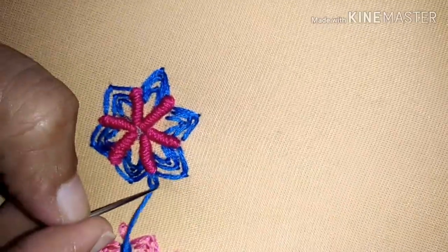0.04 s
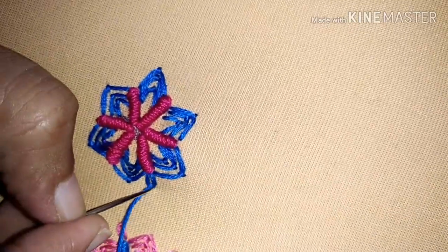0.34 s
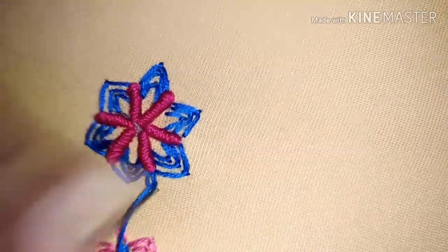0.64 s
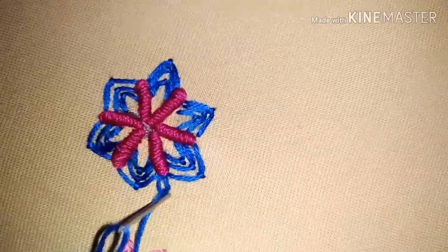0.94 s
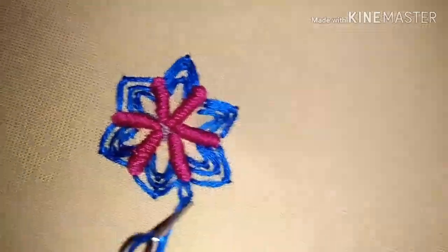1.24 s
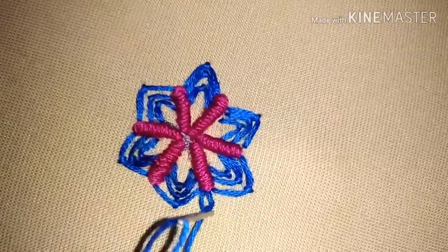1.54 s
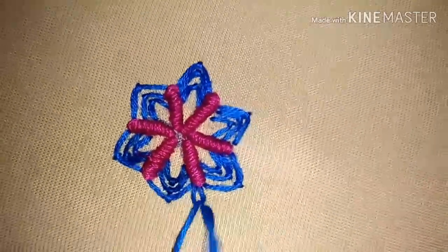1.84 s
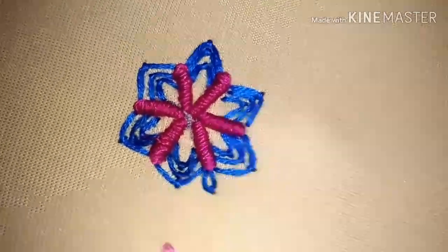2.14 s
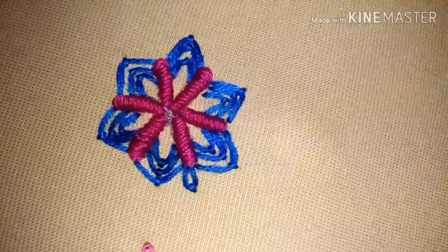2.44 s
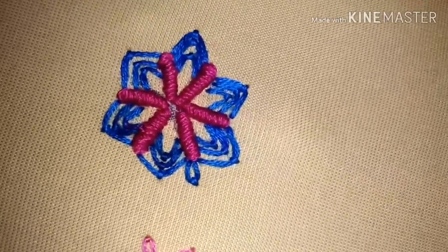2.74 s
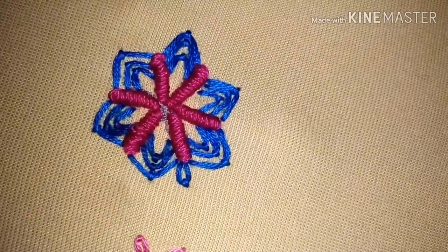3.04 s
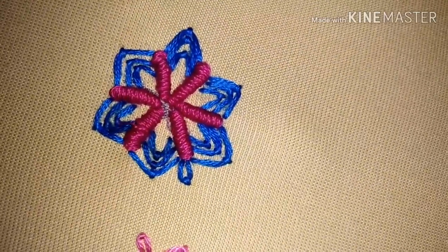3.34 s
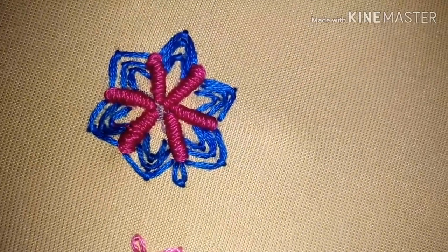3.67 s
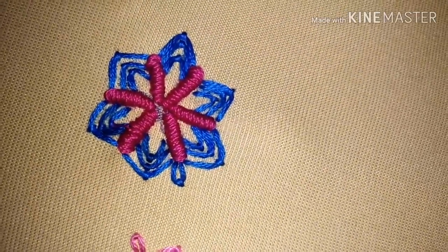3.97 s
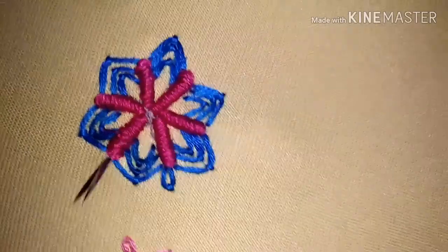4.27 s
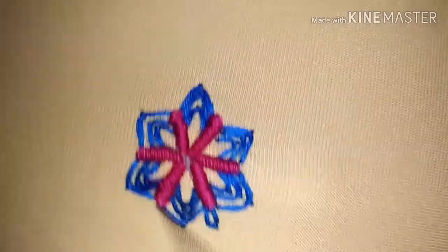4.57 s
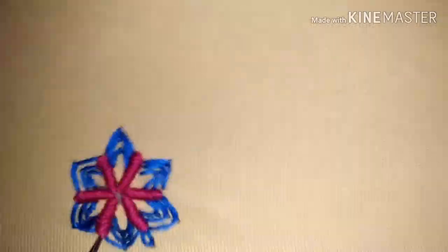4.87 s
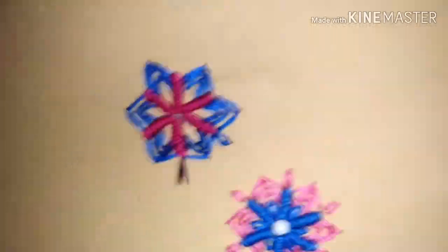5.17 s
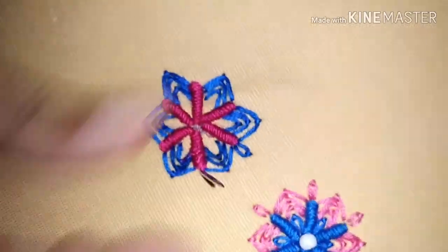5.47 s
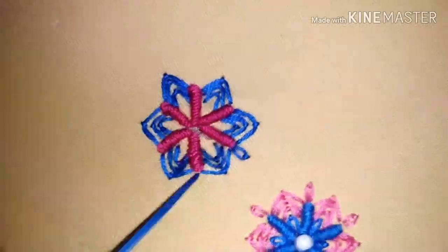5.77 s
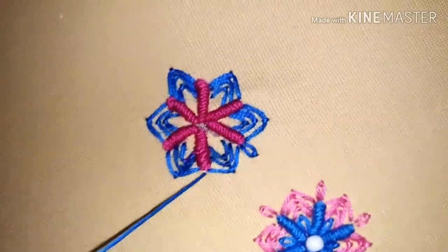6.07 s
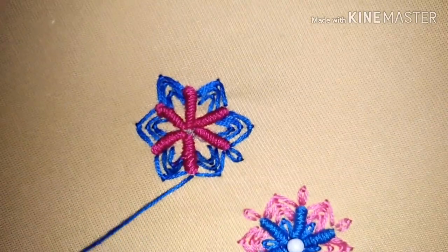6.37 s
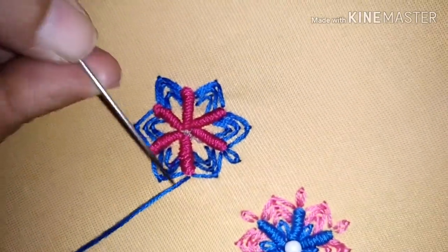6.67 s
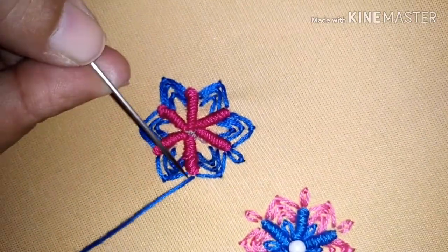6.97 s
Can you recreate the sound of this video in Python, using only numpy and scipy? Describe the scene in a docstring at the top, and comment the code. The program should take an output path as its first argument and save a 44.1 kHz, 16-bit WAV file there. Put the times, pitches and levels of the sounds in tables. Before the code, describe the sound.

Low room noise and a faint steady hum run throughout, with everything close to a small microphone and almost no echo. A hand rustles softly on an embroidery hoop, and a needle ticks at about 0.6 seconds, followed by light bumps and a faint slide of thread. At 1.9 seconds the needle pops through the taut cloth with a loud snap and a short boom like a slack drum; thread rasps and hisses after it until about 2.3 seconds. A sharp tick comes at 2.7 seconds, a soft bump at 3, then a few tiny ticks. Around 4.7 seconds the needle catches in a quick, bright cluster of ticks, with faint thread hiss and gentle nudges following. At 5.9 seconds comes a second loud pop with a deeper thump and a rasping pull of thread. Soft bumps and rustles fade by about 7 seconds.

```python
"""Low room noise and a faint hum, with a hand rustling on an embroidery hoop close to a small microphone.
The needle ticks as its point catches on strands, and fingers nudge the stretched cloth. Twice the eye
pops through: a snap coloured by the microphone's body, the cloth booming like a slack drum, and thread
rasping and hissing after it. The room is quiet, and at this distance little of it comes back."""
import sys
import numpy as np
from scipy import signal
from scipy.fft import rfft, irfft
from scipy.io import wavfile

SR = 44100
rng = np.random.default_rng(int(sys.argv[2]) if len(sys.argv) > 2 else 0)


def master_out(mix):
    """Clip the mix to full scale and print it as 16-bit PCM to the path in sys.argv[1]."""
    frames = np.transpose(np.atleast_2d(mix))
    ceiling = np.clip(frames, -1, 1)
    pcm = np.round(ceiling * 32767).astype(np.int16)
    wavfile.write(sys.argv[1], SR, pcm)


N = 317916
TIME = np.arange(N) / SR

# Spectra, all (frequency [Hz], relative level per Hz [dB])
AIR_SPECTRUM = [(20, -29), (40, 2), (57, 10.5), (80, 3), (130, -5.5), (300, -2.5), (650, -17.5),
                (1050, -5.5), (1500, -12), (2100, -12.5), (3100, -20.5), (5000, -21.5), (6200, -24),
                (7500, -61), (14000, -75)]  # steady air in the room
DRONE_SPECTRUM = [(60, -22.5), (150, -9), (230, -2.5), (340, -0.5), (450, -8), (650, -11.5), (1200, -26.5),
                  (3000, -29), (6000, -27.5), (8000, -45), (14000, -58.5)]  # the room's low drone
BRUSH_SPECTRUM = [(40, -7), (130, -4.5), (230, 4), (360, 3), (600, -9), (1300, -15), (3000, -23),
                  (6000, -24), (14000, -65)]  # a fingertip on cloth
HISS_SPECTRUM = [(300, -13), (1300, 6), (2000, 4), (2700, 2), (3300, 3), (3850, 6), (4700, 6), (6800, 2),
                 (8000, -5.5), (9600, -10), (10300, -6.5), (11200, -12), (14000, -42)]  # thread sliding through the weave
RUSTLE_SPECTRUM = [(40, -18), (120, 6.5), (400, 6), (800, -0.5), (1250, -2), (1700, -12.5), (3000, -13),
                   (6000, -36)]  # cloth under the thread's pull
CRACK_SPECTRUM = [(80, 16), (400, 0), (900, 3.5), (1400, 0), (2050, -0.5), (2700, -1.5), (3500, -5),
                  (4300, -2.5), (5500, -9.5), (7500, -13), (10000, -18.5), (14000, -31)]  # the point catching
STRAIN_SPECTRUM = [(30, -18), (70, 24.5), (120, -19), (300, 3.5), (700, -17.5), (2000, -24), (7000, -37),
                   (14000, -69)]  # cloth groaning under the eye
MIC_BODY_SPECTRUM = [(60, -16), (200, -2.5), (420, -3), (600, -3), (800, -13), (1020, -12), (1450, -11.5),
                     (2050, -31), (2700, -23.5), (3600, -39), (5300, -29), (6600, -62), (8000, -74),
                     (14000, -102)]  # the snap as coloured by the microphone's body, notched near 2 kHz
RASP_SPECTRUM = [(60, 12), (300, 19.5), (700, 9), (1350, 4), (2000, -6), (2700, -3.5), (3300, -11),
                 (3900, -5), (5000, -7.5), (6800, -8), (7500, -23), (8200, -15.5), (9200, -19.5),
                 (14000, -33)]  # doubled thread following the eye
CIRCUIT_SPECTRUM = [(25, 15), (100, -6), (1000, -1.5), (7000, -2), (10000, -2), (14000, -4)]  # microphone circuit noise, rising in the deep bass

# An appliance in the room: (frequency [Hz], rms level [dB])
HUM_LINES = [(100, -74.5), (333.8, -78.5), (899, -87.5), (1701, -84)]
# The room's decay: (frequency [Hz], time to fall 60 dB [s])
ROOM_DECAY = [(100, 0.34), (500, 0.15), (2000, 0.22), (6000, 0.22), (14000, 0.28)]
# Modes of the stretched cloth: (frequency [Hz], level [dB], time to fall 60 dB [s])
CLOTH_MODES = [(66.3, 3.5, 0.095), (95.1, 4.5, 0.094), (157, -14.5, 0.13), (198, -19.5, 0.096),
               (254, -16.5, 0.11), (362, -21.5, 0.16), (385, -24, .1), (469.5, -13.5, 0.065),
               (518, -23.5, 0.16), (620, -32, .08)]
# The hand shifts its grip on the hoop: (start [s], end [s], rustle [dB])
GRIP_SHIFTS = [(0.054, 0.075, -60), (0.33, 0.43, -59.5), (0.556, 0.753, -63), (1.042, 1.31, -64),
               (1.666, 2.313, -62.5), (2.612, 3.26, -66.5), (4.39, 5.603, -67.5), (6.18, 6.926, -67.5)]
# Fingers nudge the hoop: (time [s], cloth [dB], overtones [dB], brush [dB])
HOOP_NUDGES = [(.735, -53, 7, -64), (0.888, -48, -18, -57), (0.983, -49, -8, -59), (1.289, -56, 0, -56),
               (1.46, -50, -11, -57), (2.131, -51, -4, -53), (2.28, -48.5, -3, -56.5),
               (2.521, -50, -14, -58), (2.694, -48, 14, -49), (2.989, -40, -9, -55), (4.57, -47.5, 0, -54),
               (5.211, -49, -6, -58), (5.282, -49.5, -10, -58.5), (6.221, -41.5, -16, -61),
               (6.37, -52, -5, -65), (6.581, -48, -14, -59)]
# Thread is drawn through: (time at full speed [s], hold [s], release [s], hiss [dB], rustle [dB])
THREAD_PULLS = [(1.098, 0.022, 0.12, -66, -68), (1.90, 0.055, .015, -66.5, -58),
                (2.036, 0.071, 0.11, -67.5, -57), (2.13, 0.025, 0.015, -72.5, -58.5),
                (4.605, 0.087, 0.074, -69, -65), (4.924, .14, .3, -72, -72), (5.268, 0.018, 0.12, -91, -72),
                (5.896, 0.028, 0.018, -58, -52), (5.987, .11, 0.016, -68.5, -62),
                (6.218, .03, .04, -76.5, -63)]
# The point catches on a strand: (time [s], crack [dB], ping [dB], ping pitch [Hz],
# push on the cloth [dB], strand [dB], strand pitch [Hz])
NEEDLE_TICKS = [(0.5917, -34.5, -42, 5660, -78, -53, 4076), (0.617, -49, -70, 5500, -61, -53, 1060),
                (2.6844, -39.5, -33.5, 5560, -46.5, -39, 550), (3.217, -62, -59, 5500, -81, -76, 1000),
                (3.2294, -52, -52.5, 5320, -66, -70, 1000), (3.246, -62, -62, 5500, -78, -76, 1000),
                (3.777, -64, -62, 5550, -87, -76, 1000), (4.658, -61, -34, 6000, -74, -43, 1800),
                (4.6596, -38, -23, 5540, -50, -44, 2970), (4.662, -32, -25, 5230, -46, -31, 432),
                (4.6664, -38, -23.5, 5500, -53, -46, 850), (4.6721, -41, -36.5, 5380, -54, -45, 445),
                (4.974, -69, -55, 5700, -76, -63, 400)]
# The eye pops through: (time [s], direction up or down [signed gain], snap [dB], boom lag [s],
# boom [dB], rocking mode [dB], overtones [dB], rasp [dB], rasp length [s], strain [dB],
# strand [dB], strand pitch [Hz])
EYE_POPS = [(1.8554, 0.86, -9.5, 0.00657, -21, 1, 5, -39, 0.05, -28.5, -28, 169.4),
            (5.859, -1.14, -12, 0.0012, -13, -6, 0.5, -38.5, 0.049, -26, -45, 467)]


def amp(db):
    return 10 ** (np.asarray(db) / 20)


def unit_rms(x):
    return x / np.sqrt(np.mean(x ** 2) + 1e-20)


def value_at(points, hz):
    """Interpolates a table over a log-frequency axis."""
    f, value = np.transpose(points)
    return np.interp(np.log(hz + 1), np.log(f + 1), value)


def colour(x, spectrum):
    """Shapes x by a spectrum; rms 1."""
    gain = amp(value_at(spectrum, np.fft.rfftfreq(len(x), 1 / SR)))
    return unit_rms(irfft(rfft(x) * gain, len(x)))


def noise(spectrum, size=N):
    return colour(rng.standard_normal(size), spectrum)


def add(mix, at, sound):
    part = mix[round(at * SR):][:len(sound)]
    part += sound[:len(part)]


def wander(top_hz):
    """A random curve moving at rates from 1 Hz to top_hz; rms 1."""
    hz = np.fft.rfftfreq(N, 1 / SR)
    return unit_rms(irfft(rfft(rng.standard_normal(N)) * (hz > 1) * (hz < top_hz), N))


def stroke(at, hold, attack, release):
    """An envelope that swells up to the given time, holds, and dies away."""
    return np.exp(-(np.maximum(at - TIME, 0) / attack) ** 2 - np.maximum(TIME - at - hold, 0) / release)


def burst(hz, rise_s):
    """A short tone that swells to its peak in rise_s and soon dies."""
    t = TIME[:SR // 10]
    return (t / rise_s * np.exp(1 - t / rise_s)) ** 4 * np.sin(2 * np.pi * hz * t)


def click(spectrum, size=4096):
    """A minimum-phase click with the given spectrum; peak 1."""
    hz = abs(np.fft.fftfreq(size, 1 / SR))
    log_gain = np.log(amp(value_at(spectrum, hz)))
    pulse = np.fft.ifft(np.exp(np.conj(signal.hilbert(log_gain)))).real[:size // 2]
    return pulse / abs(pulse).max()


def room_tone(air_db=-69, drone_db=-67, flutter_db=3.5, waver_db=2.9):
    """The bed under the needlework: steady air, a fluttering drone and an appliance's wavering hum."""
    air = amp(air_db) * noise(AIR_SPECTRUM)
    drone = amp(drone_db + flutter_db * wander(top_hz=22)) * noise(DRONE_SPECTRUM)
    hum = np.zeros(N)
    for hz, db in HUM_LINES:
        peak = np.sqrt(2) * amp(db + waver_db * wander(top_hz=5))
        hum += peak * np.sin(2 * np.pi * (hz * TIME + rng.random()))
    return air + drone + hum


def room_reverb(x):
    """What the room sends back: a diffuse tail, each band dying at its own speed."""
    hz, t, bands = signal.stft(rng.standard_normal(SR // 2), SR, nperseg=256)
    decay = amp(-60 * t / value_at(ROOM_DECAY, hz)[:, None])
    _, tail = signal.istft(bands * decay, SR, nperseg=256)
    return signal.fftconvolve(x, tail / np.linalg.norm(tail))[:N]


def cloth_ring(overtones_db, contact_s, rocking_db=0):
    """Pushed cloth rings like a drum; an off-centre push favours the rocking mode and the overtones."""
    t = TIME[:SR // 2]
    weights_db = [0, rocking_db] + [overtones_db] * (len(CLOTH_MODES) - 2)
    ring = sum(amp(db + weight_db - 60 * t / t60) * np.sin(2 * np.pi * hz * t)
               for weight_db, (hz, db, t60) in zip(weights_db, CLOTH_MODES))
    return ring * (1 - np.exp(-t / contact_s))


def hand_on_hoop(ease_s=0.067, fidget_db=2, brush_lag_s=0.014, brush_width_s=0.01):
    """Handling noise: soft fingers push the cloth and brush it, unevenly as the grip keeps changing."""
    pushes = np.zeros(N)
    grips = [amp(db) * stroke(start, end - start, ease_s, ease_s) for start, end, db in GRIP_SHIFTS]
    touch = np.max(grips, axis=0) * amp(fidget_db * wander(top_hz=14))
    for at, cloth_db, overtones_db, brush_db in HOOP_NUDGES:
        add(pushes, at, amp(cloth_db) * cloth_ring(overtones_db, contact_s=0.01))
        brush = amp(brush_db) * np.exp(-((TIME - at - brush_lag_s) / brush_width_s) ** 2)
        touch = np.hypot(touch, brush)
    return pushes + touch * noise(BRUSH_SPECTRUM)


def fibre_slips(size, per_s, spread_db):
    """Fibres slip past each other in a random train of tiny, uneven impulses."""
    strength = amp(spread_db * np.minimum(rng.exponential(1, size), 4))
    return strength * rng.standard_normal(size) * (rng.random(size) < per_s / SR)


def thread_pulls(attack_s=0.027, judder_db=1.0):
    """Thread gathers speed through the weave in a fine, juddering hiss; the tensed cloth rustles too."""
    hiss = colour(fibre_slips(N, per_s=6000, spread_db=0), HISS_SPECTRUM)
    rustle = colour(fibre_slips(N, per_s=2500, spread_db=-0.5), RUSTLE_SPECTRUM)
    out = np.zeros(N)
    for at, hold, release, hiss_db, rustle_db in THREAD_PULLS:
        out += stroke(at, hold, attack_s, release) * (amp(hiss_db) * hiss + amp(rustle_db) * rustle)
    return out * amp(judder_db * wander(top_hz=65))


def needle_ticks(rise_s=0.0002, crack_decay_s=0.0026, tail_decay_s=0.016, firm_crack_db=-36):
    """The point catches: a dry crack, settling fibres, a ping, a plucked strand, a push on the cloth."""
    out, t = np.zeros(N), TIME[:SR // 10]
    onset = 1 - np.exp(-t / rise_s)
    for at, crack_db, ping_db, ping_hz, push_db, strand_db, strand_hz in NEEDLE_TICKS:
        # The settling tail lies 19.5 dB under a firm crack and grows more slowly than the crack.
        tail_db = firm_crack_db - 19.5 + 0.3 * (crack_db - firm_crack_db)
        fade = amp(crack_db) * np.exp(-t / crack_decay_s) + amp(tail_db) * np.exp(-t / tail_decay_s)
        add(out, at, onset * fade * noise(CRACK_SPECTRUM, len(t)))
        add(out, at, amp(ping_db) * burst(ping_hz, rise_s=0.0009))
        add(out, at, amp(strand_db) * burst(strand_hz, rise_s=0.0042))
        add(out, at, amp(push_db) * cloth_ring(overtones_db=2, contact_s=0.001))
    return out


def eye_pops(strain_lead_s=0.012, strain_width_s=0.0049, strand_lag_s=0.0034, rasp_fall_s=0.0045):
    """The weave strains, then frees the eye: a snap, a boom, a twanging strand and rasping thread."""
    out, t = np.zeros(N), TIME[:SR // 4]
    swell = np.exp(-(t / strain_width_s - 2) ** 2)  # peaks just before the snap
    first_grip = 1 + 3.3 * np.exp(-t / 0.00033)  # the rasp bites hardest at its start
    for (at, direction, snap_db, boom_lag, boom_db, rocking_db, overtones_db,
         rasp_db, rasp_length, strain_db, strand_db, strand_hz) in EYE_POPS:
        add(out, at - strain_lead_s, amp(strain_db) * swell * noise(STRAIN_SPECTRUM, len(t)))
        add(out, at, direction * amp(snap_db) * click(MIC_BODY_SPECTRUM))
        boom = cloth_ring(overtones_db, contact_s=0.00092, rocking_db=rocking_db)
        add(out, at + boom_lag, amp(boom_db) * boom)
        add(out, at + strand_lag_s, amp(strand_db) * burst(strand_hz, rise_s=0.017))
        grip = first_grip / (1 + np.exp((t - rasp_length) / rasp_fall_s))
        rasp = colour(fibre_slips(len(t), per_s=20000, spread_db=5.5), RASP_SPECTRUM)
        add(out, at, amp(rasp_db) * grip * rasp)
    return out


def scene(reverb_db=-28):
    """One microphone close to the hoop: nearly all direct sound, over the room tone."""
    needlework = eye_pops() + needle_ticks() + hand_on_hoop() + thread_pulls()
    return (needlework + amp(reverb_db) * room_reverb(needlework) + room_tone())[None]


def record(dry, port_hz=5620, port_q=7, port_db=5.5, low_cut_hz=46, circuit_db=-82, top_hz=14330):
    """The small microphone's port rings in the treble; then bass cut, circuit hiss and the band limit."""
    port_ring = amp(port_db) * signal.lfilter(*signal.iirpeak(port_hz, port_q, SR), dry)
    low_cut = signal.butter(5, low_cut_hz, "highpass", fs=SR, output="sos")
    heard = signal.sosfilt(low_cut, dry + port_ring)
    heard += amp(circuit_db) * noise(CIRCUIT_SPECTRUM)
    band_limit = signal.firwin(511, top_hz, window=("kaiser", 7), fs=SR)
    return signal.oaconvolve(heard, band_limit[None], "same")


dry = scene()
out = record(dry)
master_out(out)
```